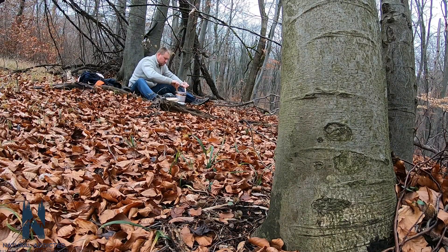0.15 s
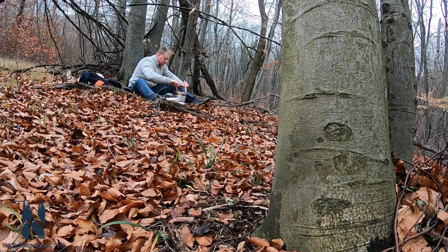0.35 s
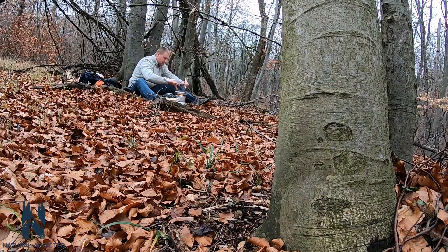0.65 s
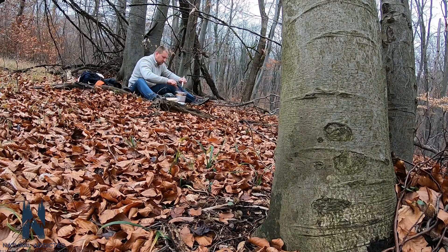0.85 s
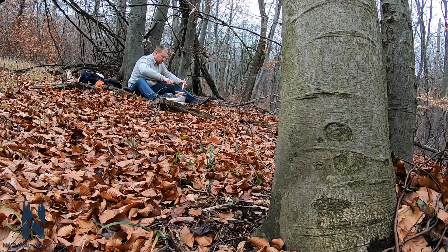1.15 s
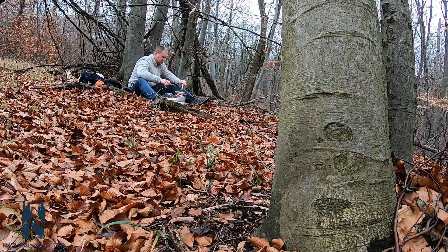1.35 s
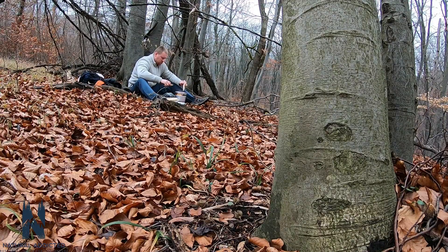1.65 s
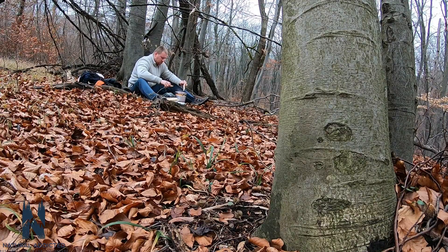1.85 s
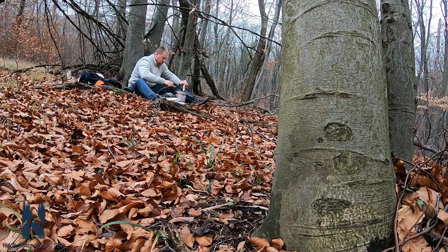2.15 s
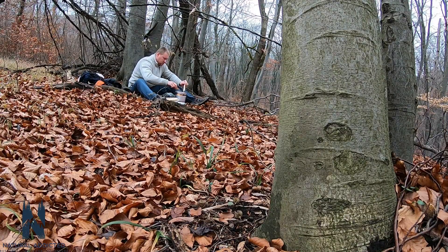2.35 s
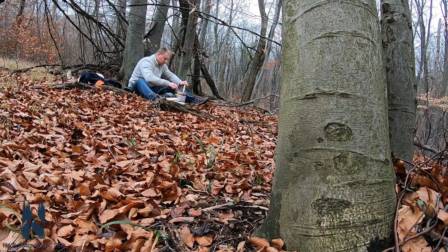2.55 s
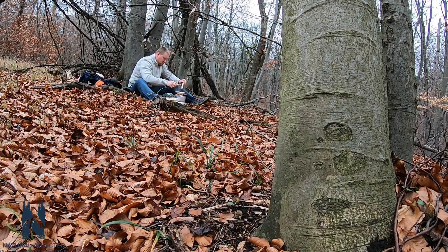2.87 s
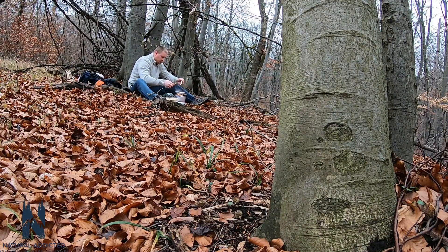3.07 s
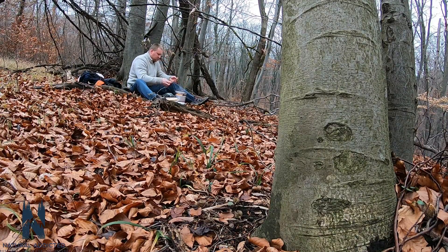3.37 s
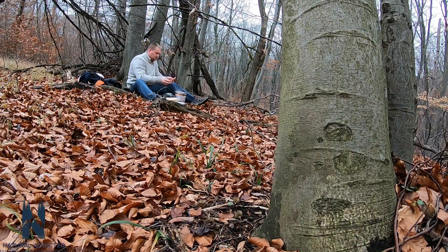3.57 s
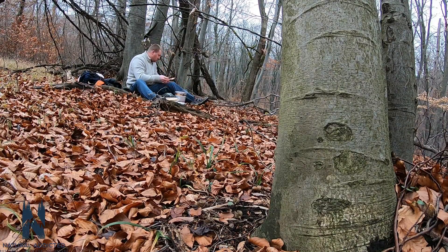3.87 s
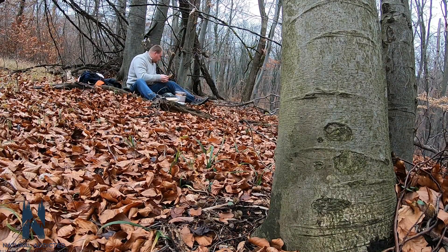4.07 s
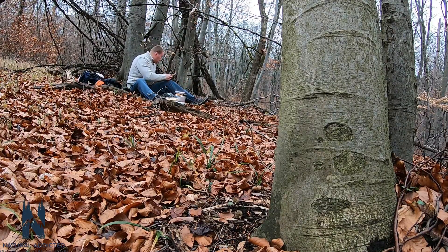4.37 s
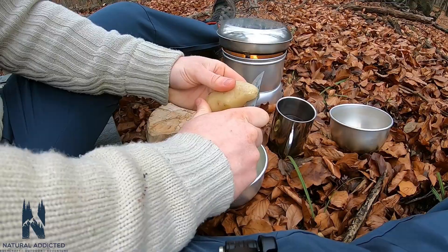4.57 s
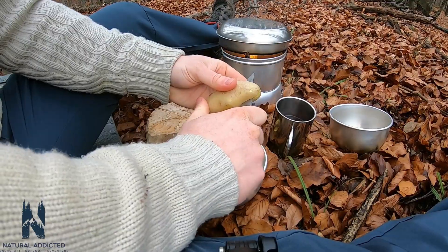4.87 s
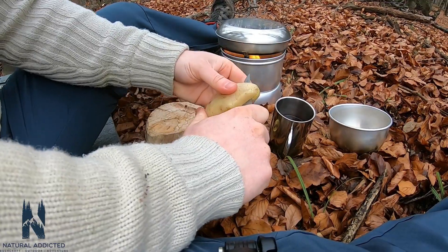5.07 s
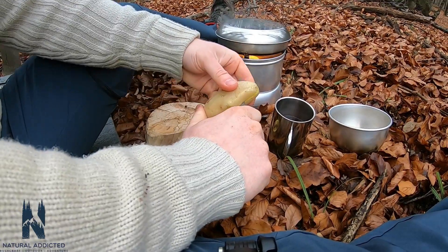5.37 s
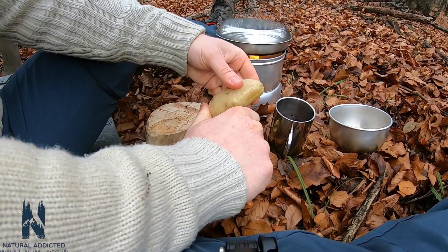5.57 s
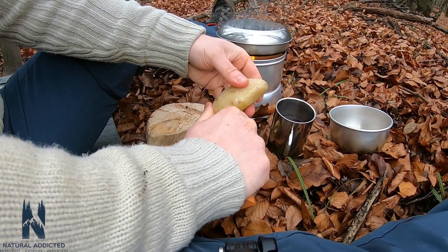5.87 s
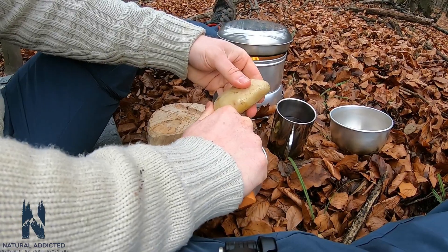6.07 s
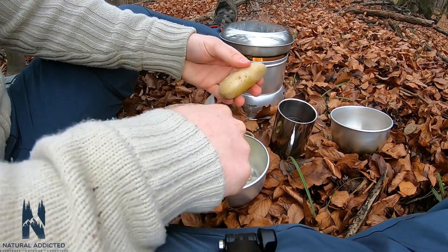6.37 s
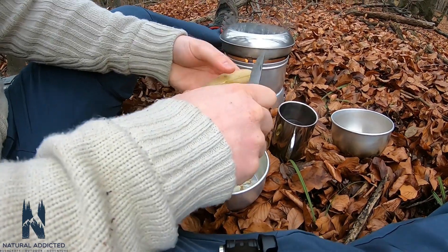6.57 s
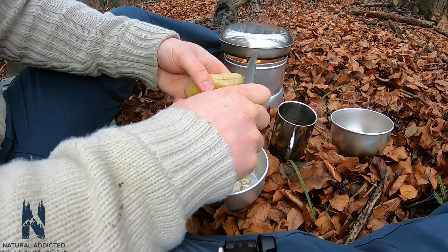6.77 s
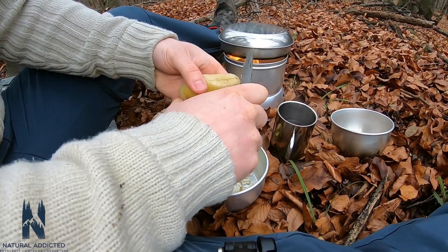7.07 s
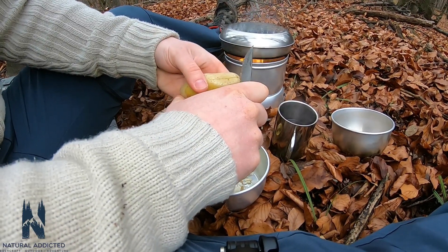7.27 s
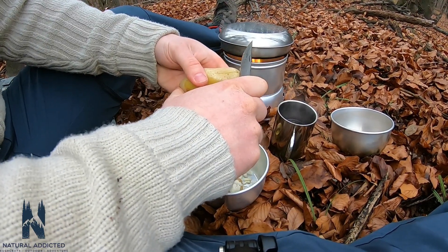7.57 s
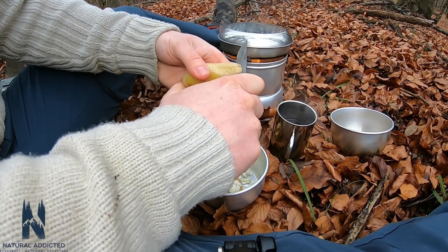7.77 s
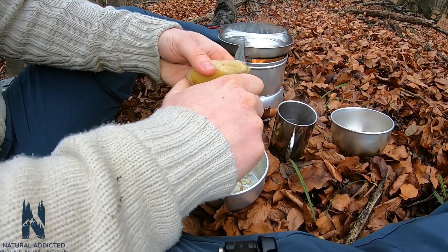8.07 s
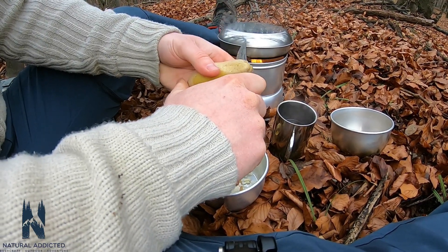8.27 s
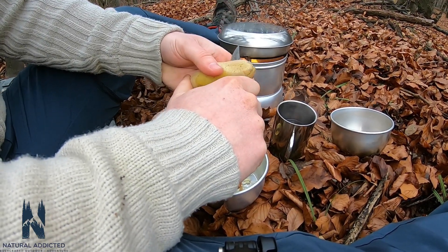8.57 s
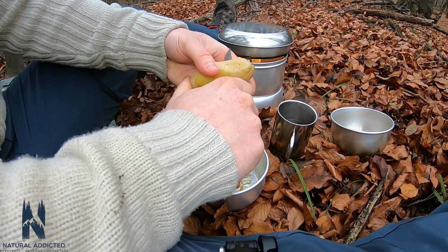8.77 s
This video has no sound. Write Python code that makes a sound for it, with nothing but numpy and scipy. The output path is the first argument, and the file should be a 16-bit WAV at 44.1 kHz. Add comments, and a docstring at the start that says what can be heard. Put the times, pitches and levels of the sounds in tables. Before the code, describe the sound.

Wind rumbles and thumps on the microphone in gusts over a faint, sparse frying crackle heard from afar. After about four and a half seconds the sound jumps beside the stove, with a dull click. Fat now sizzles steadily under a metal lid, popping and spitting over a soft flame rush, while hands and a knife make small knocks and gritty potato-peeling strokes. A very faint low hum appears near the end.

```python
"""A sausage fries in a lidded steel pot on a camp stove in a wood; random bursts in the fat make the sizzle.
From afar it is a thin crackle; then, with a click, the viewpoint jumps to beside the stove.
There the bursts are denser and excite the resonances of the pot, and the burner adds a rush of noise.
Damped tones and grit make soft knocks; gritty strokes peel a potato, and a faint hum comes and goes.
Wind rumbles on the microphone throughout, as low-frequency noise with gusts and single pressure pulses."""
import sys
import numpy as np
from scipy import signal
from scipy.fft import rfft, irfft, next_fast_len
from scipy.io import wavfile
from scipy.ndimage import uniform_filter1d, map_coordinates

SR = 44100
rng = np.random.default_rng(int(sys.argv[2]) if len(sys.argv) > 2 else 0)


def int16_out(signal):
    """Quantize to a 16-bit WAV file."""
    q = np.round(np.clip(np.atleast_2d(signal).T, -1, 1) * 32767)
    wavfile.write(sys.argv[1], SR, q.astype(np.int16))


N = 393813

TIME = np.arange(N) / SR
SIZE = 2 * next_fast_len(N // 2 + SR // 4)   # transform length, padded beyond the sound
FREQS = np.maximum(np.fft.rfftfreq(SIZE, 1 / SR), .5)
JUMP_S = 4.4886
CUTOFF_HZ = 15800


def from_db(db):
    """Level to amplitude: 20 dB is a factor of ten."""
    return 10 ** (np.asarray(db) / 20)


def rms(x):
    """Effective value: the root of the mean square."""
    return np.sqrt(np.mean(x ** 2) + 1e-20)


def unit(x):
    """Normalisation to an effective value of 1."""
    return x / rms(x)


def band(x, low_hz, high_hz, order=2):
    """Causal band-pass filtering."""
    sections = signal.butter(order, [max(low_hz, 10), high_hz], "band", fs=SR, output="sos")
    return signal.sosfilt(sections, x + 1e-18)


def drift(rate):
    """Random modulation: interpolated chance of spread 1, changing about rate times a second."""
    knots = rng.standard_normal(N // 100)
    return unit(map_coordinates(knots, [TIME * rate], order=1, mode="wrap"))


def trend(db, db_per_s, start_s):
    """Exponential gain: its level is db at start_s and changes evenly in decibels."""
    return from_db(db + db_per_s * (TIME - start_s))


def swells(rows):
    """Gaussian envelopes, summed, from rows of middle_s, length_s at half height, height."""
    return sum(height * .5 ** ((2 * (TIME - s) / length) ** 2) for s, length, height in rows)


def response(spectrum, peaks=()):
    """Minimum-phase response of a broad colour plus resonances; it passes white noise at equal power."""
    hz, db = np.transpose(spectrum)
    shape = np.interp(np.log(FREQS), np.log(hz), db)
    for centre, width, lift in peaks:
        shape = shape + lift / (1 + (2 * (FREQS - centre) / width) ** 2)
    cepstrum = irfft(np.log(from_db(shape)))
    minimum_phase = np.exp(rfft(2 * cepstrum[:SIZE // 2], SIZE))   # rings after a click, never before
    return minimum_phase / rms(np.abs(minimum_phase))


def through(x, colour):
    """Linear filtering: the spectrum of x times a frequency response."""
    return irfft(rfft(x, SIZE) * colour)[:N]


def noise(spectrum):
    """Coloured noise: steady white noise through a response, effective value about 1."""
    return through(rng.standard_normal(SIZE), response(spectrum))


def evened(x, heard, window_s):
    """Level normalisation: x divided by the running level of its heard part."""
    width = int(window_s * SR)
    power = uniform_filter1d(uniform_filter1d(heard ** 2, width), width // 2)
    return x / np.sqrt(power + 1e-12)


def tick(low_hz, high_hz, t60, snap_db, order=2):
    """Impulse and decaying noise in one band: a sharp snap with grit after it."""
    age = TIME[:SR // 5]
    grit = rng.standard_normal(len(age)) * from_db(-60 * age / t60)
    snap = from_db(snap_db) * (age == 0)
    return band(snap + grit, low_hz, min(high_hz, CUTOFF_HZ), order)


def add(out, s, db, sound):
    """Superposition: mix a short sound in at time s, with a given peak level."""
    room = out[round(s * SR):][:len(sound)]
    room += from_db(db) * sound[:len(room)] / np.abs(sound).max()


def bursts(per_s, spread_db, fine_spread_db, largest, clump_db):
    """Random impulse process: steam bubbles burst in flurries, each ringing briefly in its own band."""
    edges = np.geomspace(900, 16400, 12)
    widths, out = np.diff(edges), np.zeros(N)
    # small, high bubbles are more numerous and more alike in strength than large ones
    shares = widths ** .25 / np.sum(widths ** .25)
    spreads = np.linspace(spread_db, fine_spread_db, len(widths))
    flurry = drift(30)   # shared by all bands
    for low, width, share, spread in zip(edges, widths, shares, spreads):
        rate = per_s * share * from_db(clump_db * (flurry + drift(22)) / 2)
        born = np.flatnonzero(rng.random(N) < rate / SR)
        chance = rng.standard_normal(N)[born]
        strength = from_db(spread * np.minimum(np.abs(chance), largest) ** 2 / 2)
        clicks = np.zeros(N)
        clicks[born] = np.sign(chance) * strength
        out += band(unit(clicks), low, low + width)
    return unit(out)


def with_spatter(crackle, spatter_db, t60):
    """Envelope-modulated noise: each burst leaves a short hiss of steam, as strong as the burst was."""
    keep = from_db(-60 / (t60 * SR)) ** 2
    energy = signal.lfilter([1 - keep], [1, -keep], crackle ** 2)
    hiss = band(rng.standard_normal(N), 900, 7500)
    return crackle + from_db(spatter_db) * np.sqrt(energy) * hiss


def small_spits(per_s, level_db, spread_db, t60, low_hz, high_hz):
    """Random decaying noise bursts: small drops spit, each a brief crack across one broad band."""
    born = rng.random(N) < per_s / SR
    sizes = born * from_db(spread_db * rng.random(N) ** 2)
    envelope = signal.lfilter([1], [1, -from_db(-60 / (t60 * SR))], sizes + 1e-18)
    return from_db(level_db) * unit(band(envelope * rng.standard_normal(N), low_hz, high_hz, order=1))


# brief flares (+) and lulls (-) of the sizzle: middle_s, length_s, change_db
FLARES = [(0.14, 0.15, 1), (0.56, 0.29, 2.5), (1.4, 0.41, 0.2), (1.88, 0.35, -0.6), (2.18, 0.11, 1.6),
          (2.66, 0.4, 1.6), (3.46, 0.068, 1), (4.0, 0.56, -1), (4.53, 0.1, 2.5), (4.8, 0.37, -2),
          (5.67, 0.065, 1), (6.04, 0.096, -2), (6.6, 0.47, 1.6), (7.05, 0.11, -2), (7.16, 0.036, 2.8),
          (7.28, 0.31, 0)]
FRY_WANDER_DB, FRY_WANDERS_PER_S = 1, 5.5


def vigour():
    """Amplitude modulation: the strength of the frying wanders, with a few flares and lulls."""
    return from_db(FRY_WANDER_DB * drift(FRY_WANDERS_PER_S) + swells(FLARES))


# broad colour of the sizzle from afar: frequency_hz, density_db (per Hz, relative)
FAR_SPECTRUM = [(500, -16.5), (1100, -12), (2300, -3), (3700, -4.5), (5700, -1.5), (6300, -2.5), (7000, -1),
                (8500, -2.5), (9400, -3.5), (10500, -6), (11400, -1), (13200, 1.5), (14300, -2),
                (15500, -2.5)]
# resonances that stand out of the sizzle from afar: centre_hz, width_hz, lift_db
FAR_RESONANCES = [(1456, 510, 11), (1767, 700, 8.5), (2330, 570, 4), (2843, 330, 9.5), (3246, 520, 6.5),
                  (4214, 960, 9), (5190, 320, 4), (5870, 610, 3.5), (8000, 1500, 8.5)]


def far_colour():
    """Resonant filtering: the colour of the distant sizzle."""
    return response(FAR_SPECTRUM, FAR_RESONANCES)


# the distant frying slowly eases
FRY_FAR_DB, FRY_FAR_DB_PER_S = -60, -0.5
# at first it is fuller in one band
FULL_MIDDLE_S, FULL_LENGTH_S, FULL_LIFT_DB = 0.3, 0.9, 4.2
FULL_LOW_HZ, FULL_HIGH_HZ = 2200, 2700


def frying_far(colour):
    """Sparse impulses over weak noise: from afar, single crackles and small spits stand out of a hiss."""
    crackle = bursts(per_s=8000, spread_db=5.0, fine_spread_db=1.0, largest=2.96, clump_db=3.5)
    spattering = with_spatter(crackle, spatter_db=-7.5, t60=0.022)
    cracks = small_spits(per_s=40, level_db=-10.5, spread_db=5, t60=0.017, low_hz=2200, high_hz=6470)
    hiss = from_db(-3.8) * rng.standard_normal(N)
    sizzle = spattering + cracks + hiss
    lift = from_db(swells([(FULL_MIDDLE_S, FULL_LENGTH_S, FULL_LIFT_DB)])) - 1
    fuller = lift * band(sizzle, FULL_LOW_HZ, FULL_HIGH_HZ)
    return trend(FRY_FAR_DB, FRY_FAR_DB_PER_S, 0) * vigour() * through(sizzle + fuller, colour)


# air in the trees: frequency_hz, density_db (per Hz, relative)
TREE_SPECTRUM = [(20, -25), (90, 8.5), (180, 1.5), (350, 0.5), (700, -2), (1200, -2.5), (2500, -13),
                 (8000, -66)]


def trees():
    """Turbulence noise: steady air in the trees, heard in the far view."""
    return from_db(-66.0) * noise(TREE_SPECTRUM)


# wind on the microphone at each place: frequency_hz, density_db (per Hz, relative)
WIND_FAR_SPECTRUM = [(1, -4), (4, 24.5), (10, 15), (20, -6), (40, -13), (70, -24.5), (120, -34),
                     (250, -49.5), (600, -78)]
WIND_NEAR_SPECTRUM = [(1, 11), (4, 27), (10, 13.5), (20, 2), (40, -10), (70, -34), (120, -51), (250, -67),
                      (600, -86.5)]
# gust by gust change of the breeze: middle_s, length_s, rumble_lift_db, flutter_lift_db
# (the last row is no gust but a click where the sound is cut off)
GUSTS = [(0.076, 0.039, 21, 16.5), (0.204, 0.073, -3, 4), (0.45, 0.12, -17, 8), (0.603, 0.12, -1, 11),
         (0.713, 0.11, 19.5, -1), (0.953, 0.15, 15, -1), (1.027, 0.046, -11, 10.5), (1.25, 0.38, 15, 7.5),
         (1.574, 0.16, 19, 14.5), (1.756, 0.22, 12, 3), (1.893, 0.09, -6, 6.5), (2.063, 0.15, 15, 9),
         (2.312, 0.1, 8, 8), (2.47, 0.095, 12, 5), (2.68, 0.1, 13, 6), (2.83, 0.17, 11, 12),
         (3.03, 0.21, 10, 3), (3.695, 0.18, 9, 5), (4.264, 0.33, 11, 0), (4.64, 0.065, 17.5, 16),
         (4.803, 0.19, 21, 13), (5.042, 0.084, 17, 11), (5.3, 0.12, 10.5, 7.5), (5.497, 0.14, 7, 1),
         (5.722, 0.21, 6, 10.5), (5.954, 0.11, 15, 7), (6.196, 0.26, -1, 4), (6.457, 0.057, 4.5, 10),
         (6.548, 0.17, 20.5, 5), (6.742, 0.096, 18, 11), (6.887, 0.097, 12, 12), (7.206, 0.14, 13, 11.5),
         (7.47, 0.15, 8.5, 5.5), (7.653, 0.3, 9.5, 7), (7.86, 0.072, 19, 8), (7.994, 0.14, 11, 10),
         (8.118, 0.12, -8, 6.5), (8.29, 0.073, 10, 1), (8.5, 0.16, 17, 8.5), (8.648, 0.08, 14, 12.5),
         (8.904, 0.14, 4.5, 30)]
# deep sway of the air, before the gusts act on it: time_s, level_db
SWAY_LEVELS = [(0, -14.5), (0.75, -31), (1.75, -26.5), (2.75, -32), (4.45, -32.5), (4.55, -18), (5.3, -25),
               (6.1, -17), (8.9, -16.5)]
SWAY_FOLLOWS = 0.19   # share of a gust's rumble lift that reaches the sway
# the sway gives way to rumble, and the rumble to flutter
SWAY_BELOW_HZ, RUMBLE_BELOW_HZ = 19, 70
# between gusts the breeze slowly sinks from afar and picks up beside the stove
BREEZE_FAR_DB, BREEZE_FAR_DB_PER_S = -62, -1
BREEZE_NEAR_DB, BREEZE_NEAR_DB_PER_S = -58, 2
FLUTTER_FAR_DB, FLUTTER_NEAR_DB = -6, -10.5   # relative to the rumble


def wind(lumps_db):
    """Turbulent pressure noise: eddies make a deep sway, and a rumble and a flutter that follow the gusts."""
    beside = np.clip((TIME - JUMP_S) / .05, 0, 1)   # 0 from afar, 1 beside the stove
    eddies = (1 - beside) * noise(WIND_FAR_SPECTRUM) + beside * noise(WIND_NEAR_SPECTRUM)
    sway = through(eddies, 1 / (1 + (FREQS / SWAY_BELOW_HZ) ** 8))
    lows = through(eddies, 1 / (1 + (FREQS / RUMBLE_BELOW_HZ) ** 8))
    audible_rumble = band(eddies, 32, RUMBLE_BELOW_HZ) - band(sway, 32, RUMBLE_BELOW_HZ)
    rumble = evened(lows - sway, audible_rumble, .1)
    flutter = evened(eddies - lows, eddies - lows, .1)
    far_breeze = trend(BREEZE_FAR_DB, BREEZE_FAR_DB_PER_S, 0)
    near_breeze = trend(BREEZE_NEAR_DB, BREEZE_NEAR_DB_PER_S, JUMP_S)
    breeze = (1 - beside) * far_breeze + beside * near_breeze
    rumble_db = swells([(s, length, db) for s, length, db, _ in GUSTS])
    flutter_db = swells([(s, length, db) for s, length, _, db in GUSTS])
    flutter_db = flutter_db + (1 - beside) * FLUTTER_FAR_DB + beside * FLUTTER_NEAR_DB
    gusty = from_db(rumble_db) * rumble + from_db(flutter_db) * flutter
    buffeting = breeze * from_db(lumps_db * drift(7.7)) * gusty
    sway_db = np.interp(TIME, *np.transpose(SWAY_LEVELS)) + SWAY_FOLLOWS * rumble_db
    return buffeting + from_db(sway_db) * evened(sway, sway, 0.48)


# the loudest spits of fat: start_s, peak_db, centre_hz
SPITS = [(0.024, -43, 2200), (0.082, -44.5, 2700), (0.116, -45, 7500), (0.159, -39, 11000),
         (0.179, -39, 5570), (0.229, -51, 4200), (0.298, -37, 2700), (0.334, -43, 3200), (0.491, -47, 2600),
         (0.562, -45, 2600), (0.661, -42, 2800), (0.699, -39, 9000), (1.148, -47, 8100), (1.209, -49, 2800),
         (1.312, -47, 3300), (1.374, -51, 2800), (1.444, -40, 7300), (1.496, -42, 3800), (1.778, -45, 8400),
         (1.892, -42, 3000), (2.147, -41, 7900), (2.16, -42, 7000), (2.241, -34, 2700), (2.246, -44, 2500),
         (2.263, -44, 3000), (2.574, -44, 3000), (2.715, -43, 3500), (2.729, -43, 7500),
         (2.772, -43.5, 2400), (3.183, -47, 6000), (3.41, -42.5, 2900), (3.456, -42, 4600),
         (3.582, -46, 2700), (3.613, -43, 7900), (3.622, -44, 7000), (3.641, -43, 6000), (3.749, -44, 3400),
         (3.85, -41, 12000), (4.101, -44, 3000), (4.104, -42, 7800), (4.192, -48, 3400), (4.256, -45, 2930),
         (4.463, -44, 2920), (5.311, -45, 5000), (5.407, -38.5, 3000), (5.513, -37.5, 3000),
         (5.694, -43, 5000), (6.345, -39, 7400), (6.488, -39, 3600), (6.508, -37, 2900), (6.565, -37, 2600),
         (6.785, -35.5, 3100), (7.003, -42, 5500), (7.155, -39, 8000), (7.213, -37, 2400),
         (7.881, -39, 5500), (7.948, -40, 3200), (8.42, -43, 2400), (8.429, -34, 3300), (8.806, -50, 2200)]
SPIT_SPAN = 1.53   # a spit's band reaches this factor below and above its centre
SPIT_T60_S, SPIT_SNAP_DB = 0.014, 9


def spits(far_response, near_response):
    """Convolution with a resonator: drops of fat explode in broad cracks, coloured like the sizzle."""
    out = np.zeros(N)
    far_ring = irfft(far_response)[:SR // 20]
    near_ring = irfft(near_response)[:SR // 20]
    for s, db, hz in SPITS:
        crack = tick(hz / SPIT_SPAN, hz * SPIT_SPAN, SPIT_T60_S, SPIT_SNAP_DB, order=1)
        add(out, s, db, signal.fftconvolve(crack, far_ring if s < JUMP_S else near_ring))
    return out


# single eddies that thump the microphone: middle_s, peak_db, centre_hz
BUFFETS = [(0.079, -31, 42), (1.529, -45, 40), (1.758, -34, 40), (2.82, -46, 52), (4.631, -35, 45.7),
           (6.435, -43, 50), (7.655, -33, 35.6), (8.45, -31, 52), (8.51, -39, 42), (8.623, -36, 40)]


def buffets():
    """Pressure pulses: single eddies hit the microphone, each one soft push with a dip on either side."""
    out = np.zeros(N)
    for s, db, hz in BUFFETS:
        age = np.pi * hz * (TIME[:SR // 10] - .05)
        add(out, s - .05, db, (1 - 2 * age ** 2) * np.exp(-age ** 2))
    return out


# soft knocks and short scrapes of knife and hands:
# start_s, peak_db, pitch_hz, width_hz, t60_s, roughness (a share, limited to 0-1)
KNOCKS = [(0.236, -44.5, 1550, 400, 0.014, 0.3), (2.241, -47.5, 1420, 400, 0.031, .4),
          (3.048, -50, 1814, 250, 0.025, 0.4), (4.87, -40, 1100, 900, 0.028, 1),
          (5.109, -45, 1300, 600, 0.14, 1.1), (6.564, -43.5, 1120, 900, 0.038, .9),
          (6.903, -43, 2530, 300, 0.031, .2), (6.918, -46, 1400, 400, 0.27, 1),
          (7.293, -39.5, 403, 405, 0.051, 1), (7.775, -40, 1760, 250, 0.022, .15),
          (7.976, -42, 764, 500, 0.052, 0.74), (8.398, -45, 590, 200, 0.045, .2)]
KNOCK_ATTACK_S = 0.0007


def knocks(snap_db):
    """Damped oscillation: short contacts of which the clean ones ring and the rough ones rasp."""
    out, age = np.zeros(N), TIME[:SR // 5]
    for s, db, hz, width_hz, t60, rough in KNOCKS:
        envelope = from_db(-60 * age / t60) * (1 - np.exp(-age / KNOCK_ATTACK_S))
        ring = np.sin(2 * np.pi * hz * age) * envelope
        grit = tick(hz - width_hz / 2, hz + width_hz / 2, t60, snap_db)
        rough = np.clip(rough, 0, 1)
        add(out, s, db, (1 - rough) * unit(ring) + rough * unit(grit))
    return out


def jump_click(step_db, settle_s):
    """Step and exponential decay: the waveform steps down at the cut between the views: one dull click."""
    age = np.maximum(TIME - JUMP_S, 0)
    return -from_db(step_db) * (age > 0) * np.exp(-age / settle_s)


def weak_modes(count):
    """Modal density: thin walls have many faint modes; rows of centre_hz, width_hz, lift_db."""
    centres = rng.uniform(2000, 15000, count)
    return np.column_stack([centres, np.full(count, 70), rng.normal(0, 1.1, count)])


# broad colour of the sizzle beside the stove: frequency_hz, density_db (per Hz, relative)
NEAR_SPECTRUM = [(500, -32), (1200, -7), (2100, -2.5), (3000, -7.5), (3600, -7.5), (5300, -6.5),
                 (6100, -4.5), (7000, -2), (8500, -0.2), (9500, -6.5), (12800, -5.5), (13800, -8),
                 (15500, -9.5)]
# resonances (+) and dips (-) of the pot under its lid: centre_hz, width_hz, lift_db
POT_RESONANCES = [(850, 100, 3), (1800, 250, -1.5), (2180, 110, -4.5), (2390, 120, 4.4), (2560, 190, 5.0),
                  (2920, 220, -2.2), (3130, 200, 3.9), (3480, 380, 4.9), (4125, 74, 2.5), (4461, 90, 7.6),
                  (4688, 50, 5.5), (4790, 90, -3), (5330, 80, -3), (5620, 110, 2.5), (6190, 80, -3),
                  (6586, 130, 3.2), (6821, 60, 4.4), (7170, 216, 2.6), (7530, 55, 4.2), (7700, 90, -3),
                  (7900, 260, 2.8), (8328, 65, 2.5), (8700, 200, 2.5), (11568, 127, 3.2)]


def pot_colour():
    """Modal resonance: strong modes of the lidded pot and many weak ones shape the near sizzle."""
    return response(NEAR_SPECTRUM, [*POT_RESONANCES, *weak_modes(count=110)])


def pings(count, level_db, spread_db, low_hz, high_hz, t60):
    """Damped bubble oscillation: larger bubbles pop under the lid, each ringing at its own pitch."""
    out, age = np.zeros(N), TIME[:SR // 20]
    for when, pitch, size in rng.random((count, 3)):
        hz = low_hz * (high_hz / low_hz) ** pitch
        ring = np.sin(2 * np.pi * hz * age) * from_db(-60 * age / t60)
        add(out, when * TIME[-1], level_db + spread_db * size ** 2, ring)
    return out


# the near frying slowly builds
FRY_NEAR_DB, FRY_NEAR_DB_PER_S = -53, 0.2362


def frying_near(colour):
    """Dense impulses through a resonator: countless bursts merge into a sizzle that rings in the pot."""
    crackle = bursts(per_s=20000, spread_db=4.5, fine_spread_db=0.9, largest=3.24, clump_db=2.5)
    spattering = with_spatter(crackle, spatter_db=-6.0, t60=0.026)
    cracks = small_spits(per_s=45, level_db=-9.5, spread_db=10, t60=0.028, low_hz=2400, high_hz=6500)
    pops = pings(count=900, level_db=-10, spread_db=15.5, low_hz=1880, high_hz=9920, t60=0.017)
    hiss = from_db(-8.5) * rng.standard_normal(N)
    sizzle = spattering + pops + cracks + hiss
    return trend(FRY_NEAR_DB, FRY_NEAR_DB_PER_S, JUMP_S) * vigour() * through(sizzle, colour)


# rush of the burner: frequency_hz, density_db (per Hz, relative)
BURNER_SPECTRUM = [(40, -31), (150, 0.5), (300, 0), (600, 1), (850, 2), (1250, 1), (1700, -6), (3000, -16),
                   (8000, -37)]
FLAME_DB, FLAME_DB_PER_S = -57.5, 0.41   # slowly growing from the jump on


def burner(flutter_db):
    """Modulated turbulence noise: the flame rushes and flutters under the pot."""
    flutter = from_db(flutter_db * drift(45))
    return trend(FLAME_DB, FLAME_DB_PER_S, JUMP_S) * flutter * noise(BURNER_SPECTRUM)


# strokes of the knife: middle_s, length_s, level_db, centre_hz
SCRAPES = [(5.316, 0.04, -59.5, 4200), (6.479, 0.118, -58, 4080), (7.162, 0.04, -56, 10440)]
SCRAPE_GRIT_DB, SCRAPE_GRAINS_PER_S = 2, 250
SCRAPE_SPAN = 0.2   # half the bandwidth, as a share of the centre


def peeling():
    """Friction noise: the blade rasps through the potato skin in a few short, gritty strokes."""
    out = np.zeros(N)
    for s, length, db, hz in SCRAPES:
        grit = from_db(db + SCRAPE_GRIT_DB * drift(SCRAPE_GRAINS_PER_S))
        rasp = unit(band(rng.standard_normal(N), hz * (1 - SCRAPE_SPAN), hz * (1 + SCRAPE_SPAN)))
        out += grit * swells([(s, length, 1)]) * rasp
    return out


# a faint hum comes and goes: start_s, length_s
HUMS = [(8.234, 0.348), (8.748, 0.3)]
HUM_HZ, HUM_DB, HUM_FADE_S = 232, -62.5, 0.048


def hum(waver):
    """Frequency modulation: a faint, slightly wavering low tone that fades in, holds and fades out."""
    pitch = HUM_HZ * (1 + waver * drift(10))
    on = np.zeros(N)
    for s, length in HUMS:
        on += np.clip(np.minimum(TIME - s, s + length - TIME) / HUM_FADE_S, 0, 1)
    tone = np.sqrt(2) * np.sin(2 * np.pi * np.cumsum(pitch) / SR)
    return from_db(HUM_DB) * on * tone


def scene():
    """Superposition: the far view, then the near one, with wind throughout."""
    distant, pot = far_colour(), pot_colour()
    far = frying_far(distant) + trees()
    near = frying_near(pot) + burner(flutter_db=0.93) + peeling() + hum(waver=0.0052)
    air = wind(lumps_db=1.5) + buffets()
    ticks = spits(distant, pot) + knocks(snap_db=13) + jump_click(step_db=-15.5, settle_s=0.024)
    return (np.where(TIME < JUMP_S, far, near) + ticks + air)[None]


def record(dry):
    """Low-pass filtering: the top is cut steeply."""
    return signal.sosfilt(signal.ellip(12, .1, 90, CUTOFF_HZ, fs=SR, output="sos"), dry)


dry = scene()
out = record(dry)
int16_out(out)
```